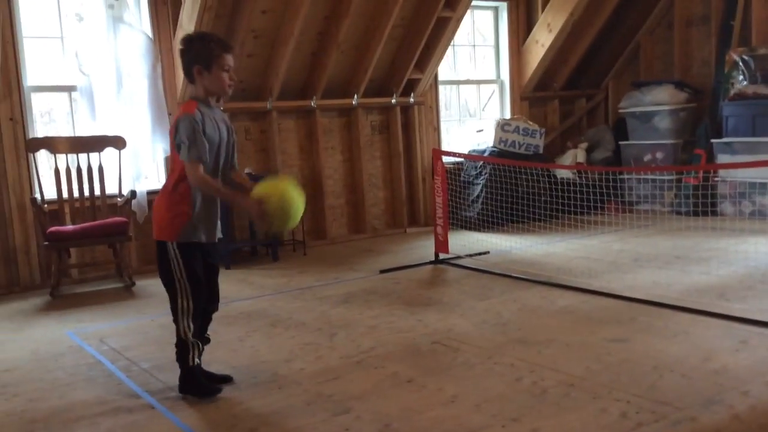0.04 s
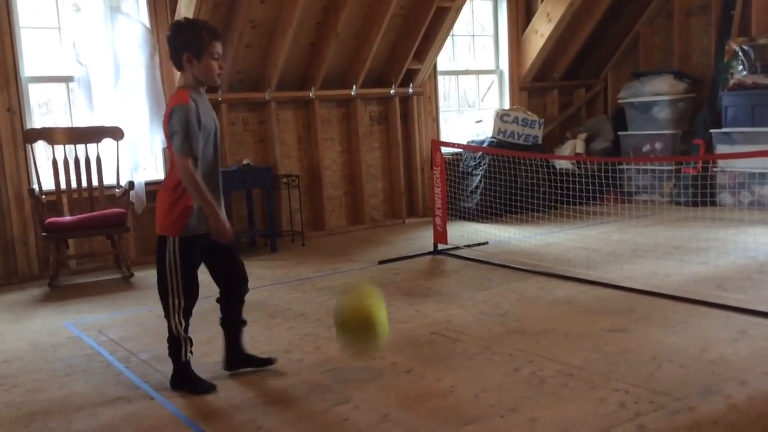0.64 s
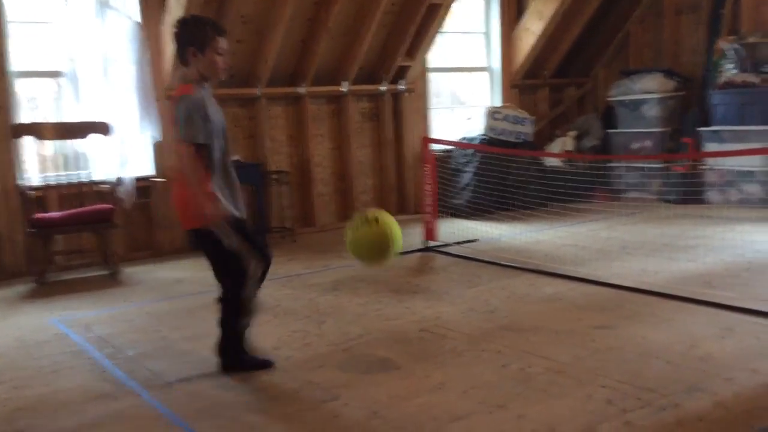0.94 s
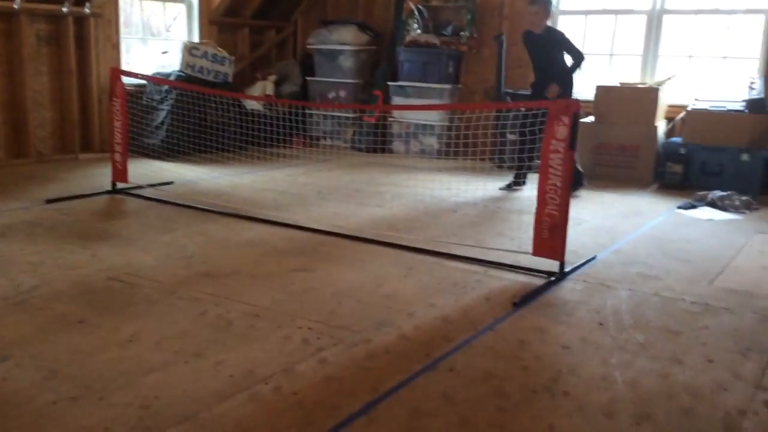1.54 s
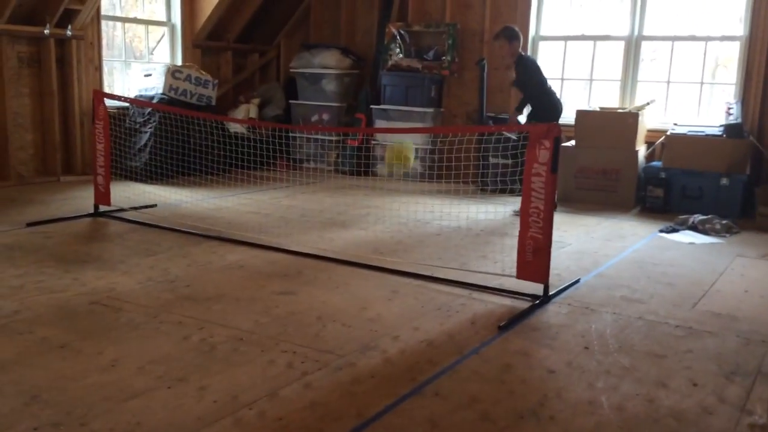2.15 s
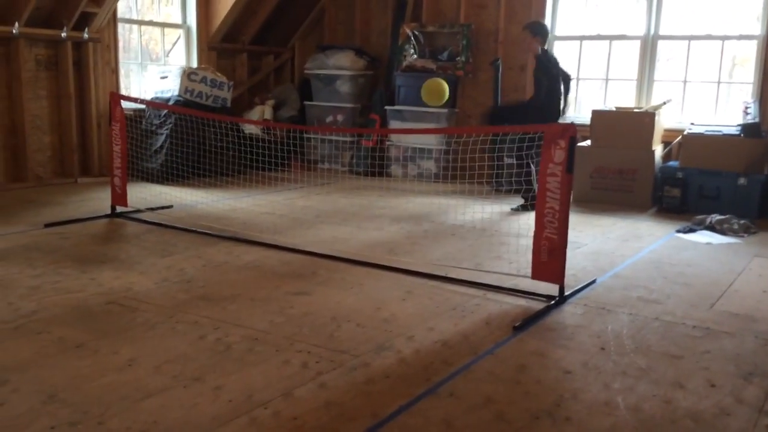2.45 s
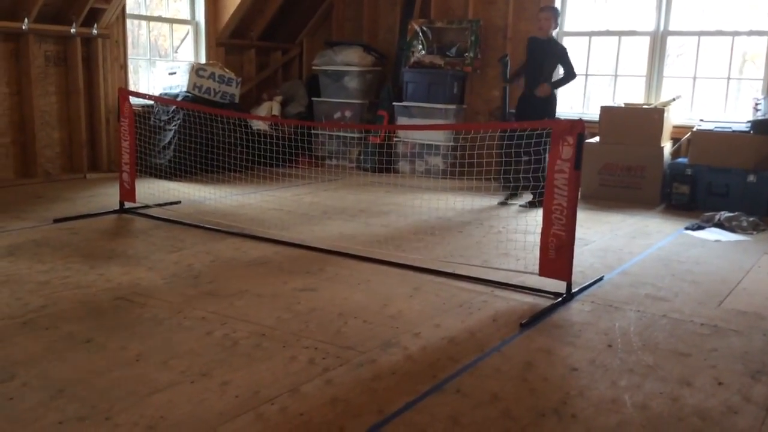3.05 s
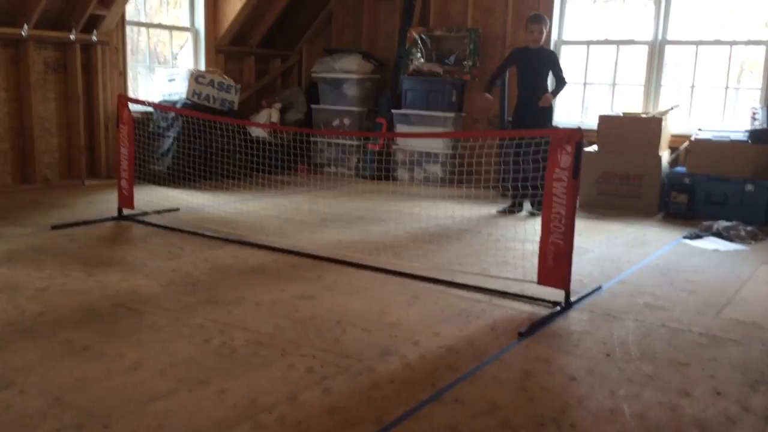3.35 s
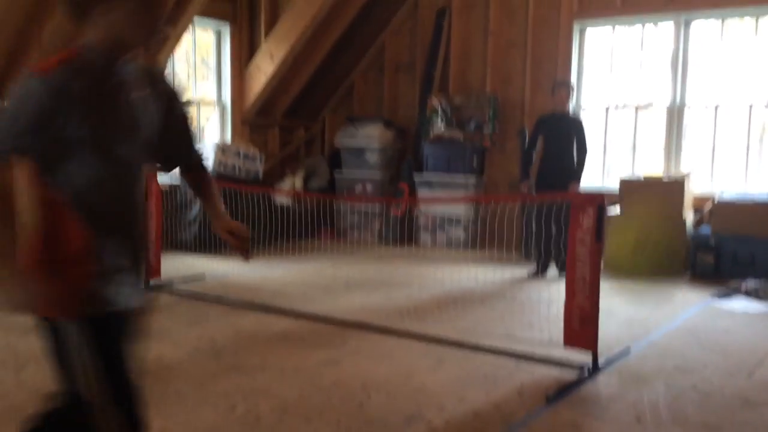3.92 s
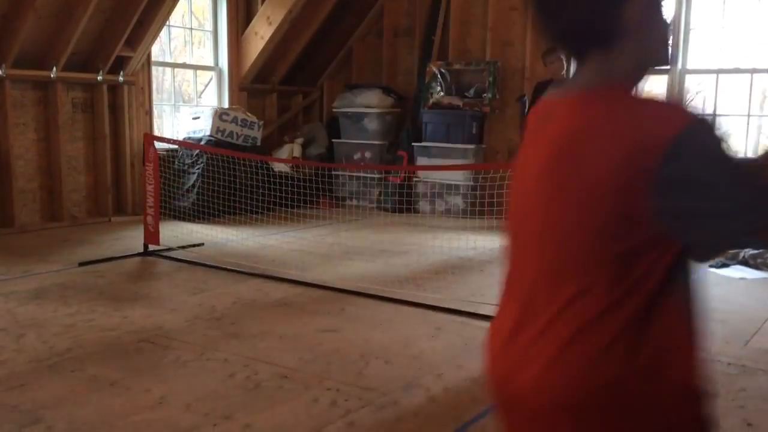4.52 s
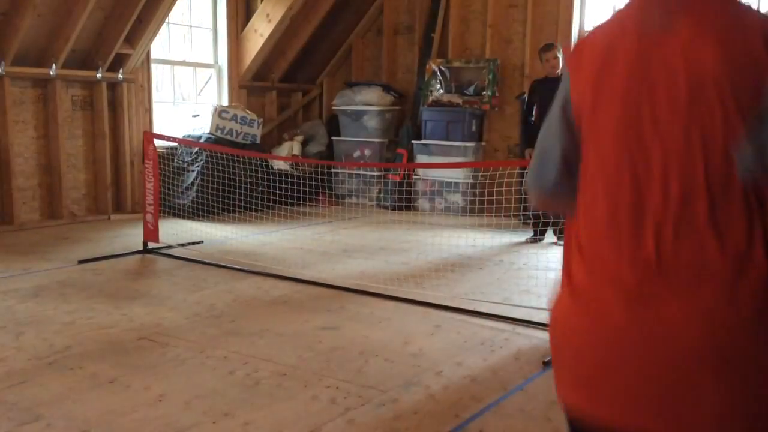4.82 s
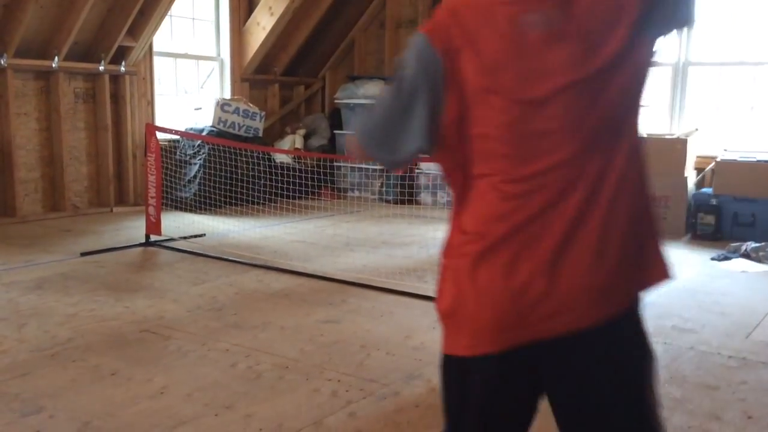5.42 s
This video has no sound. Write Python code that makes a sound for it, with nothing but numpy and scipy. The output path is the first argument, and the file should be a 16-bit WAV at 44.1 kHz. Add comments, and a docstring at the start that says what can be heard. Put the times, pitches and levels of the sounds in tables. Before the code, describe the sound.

Hollow, ringing smacks of a big ball boom on floorboards in an echoing room, between padded steps and fabric swishes.

```python
"""Two players in socks kick a big felt-covered ball over a net in a bare wooden attic.
Clothes rustle over a faint hiss, then the first of six blows lands at 0.8 s. Each one snaps the shell,
rings the air inside the ball and booms the plywood floor; the rafters echo it. Soft steps, hollow knocks
and swishes fill the gaps. The hardest blow comes at 3.9 s and a softer one at 4.5 s;
a last few knocks and steps give way to rustling clothes."""
import sys
import numpy as np
from scipy import signal
from scipy.fft import rfft, irfft
from scipy.io import wavfile
from scipy.ndimage import uniform_filter1d

SR = 44100
rng = np.random.default_rng(int(sys.argv[2]) if len(sys.argv) > 2 else 0)


def wav_out(sig):
    """Save sig, one row per channel (or a flat mono array), as 16-bit PCM at SR to the path in sys.argv[1]."""
    wavfile.write(sys.argv[1], SR, np.round(np.clip(np.atleast_2d(sig).T, -1, 1) * 32767).astype(np.int16))


N = 245622
T = np.arange(SR) / SR  # one second, the life of a blow


def undb(db):
    """Decibels to gain."""
    return 10 ** (np.asarray(db) / 20)


def unit_rms(x):
    """Scale to an rms of 1."""
    return x / np.sqrt(np.mean(x ** 2))


def add(track, start_s, sound):
    """Mix a sound into the track."""
    i = max(int(start_s * SR), 0)
    track[i:i + len(sound)] += sound[:N - i]


def lowpass(x, hz, order=2):
    """Butterworth low-pass."""
    return signal.sosfilt(signal.butter(order, min(hz, SR / 2 - 1), fs=SR, output="sos"), x)


def colour(x, spectrum, tilt_db=0):
    """EQ through (freq_hz, level_db) points, tilted by tilt_db an octave; white noise keeps its level."""
    hz, db = np.transpose(spectrum)
    octaves = np.log2(np.maximum(np.fft.rfftfreq(len(x), 1 / SR), hz[0]) / 4000)
    gain = undb(np.interp(octaves, np.log2(hz / 4000), db) + tilt_db * octaves)
    return irfft(rfft(x) * unit_rms(gain), len(x))


def noise(spectrum, size):
    """Coloured noise with an rms near 1."""
    return colour(rng.standard_normal(size), spectrum)


def ring(modes, detune=0):
    """Struck modes; neighbours swing in opposite directions, and each hit detunes them a little."""
    out = np.zeros(len(T))
    for k, (hz, db, t60) in enumerate(modes):
        hz = hz * (1 + detune * rng.standard_normal())
        out += (-1) ** k * undb(db) * np.exp(-np.log(1000) * T / t60) * np.sin(2 * np.pi * hz * T)
    return out


# room tone: freq_hz, level_db
HISS_SPECTRUM = [(25, -4), (60, 3), (120, -0.5), (250, -7.5), (500, -16.5), (1000, -18.5), (3000, -26.5),
                 (5200, -22), (7200, -29), (8800, -20.5), (12000, -24), (15500, -30)]
def hiss(level_db=-64.7):
    """The quiet room: a low rumble and a faint hiss."""
    return undb(level_db) * noise(HISS_SPECTRUM, N)


# the attic's reverb bands: freq_hz, level_db, t60_s
ATTIC_BANDS = [(55, -3, .5), (83, 4, 0.36), (135, 3.5, 0.37), (210, -3, 0.5), (306, 5, 0.39),
               (500, 3.5, 0.56), (740, -0.5, 0.49), (1400, 1, 0.55), (4000, 1.5, 0.57), (8000, 0, 0.58),
               (14000, 1.5, .3)]
def attic(build_s=.006, lumpy_db=5, thicken_s=.023):
    """The echo from one spot: separate early reflections thicken into a wash that dies band by band."""
    log_hz = np.log(np.maximum(np.fft.rfftfreq(len(T), 1 / SR), 1))
    band_hz, levels_db, t60s = np.transpose(ATTIC_BANDS)
    paths = np.repeat(rng.uniform(-1, 1, len(T)), SR // 500)[:len(T)]  # a new strength every 2 ms
    scatter = undb(lumpy_db * np.exp(-T / thicken_s) * paths)
    spectrum = rfft(rng.standard_normal(len(T)) * scatter)
    build = 1 - np.exp(-(T / build_s) ** 2)
    out = 0
    for share, db, t60 in zip(np.eye(len(band_hz)), levels_db, t60s):
        fade = build * np.exp(-np.log(1000) * T / t60)
        band = irfft(spectrum * np.interp(log_hz, np.log(band_hz), share), len(T))
        out = out + undb(db) * band * fade / np.sqrt(np.sum((fade * scatter) ** 2))
    return out


def in_room(x, echo, room_db):
    """A dry sound plus its echo."""
    return x + undb(room_db) * signal.fftconvolve(x, echo)[:len(x)]


def slap(spectrum, decay_s, room_db, tilt_db=0):
    """A brief rough contact: a noise burst and its smooth echo, coloured together."""
    burst = rng.standard_normal(len(T)) * np.exp(-T / decay_s)
    wet = burst / np.linalg.norm(burst) + undb(room_db) * attic()
    return colour(np.pad(wet, (0, len(T))), spectrum, tilt_db)[:len(T)]


# the sharpest ticks of clothing and fingers: start_s, level_db, pitch_hz
SHARP_TICKS = [(.0394, -34.5, 11500), (.6186, -44, 8000), (1.1869, -31.5, 10000), (4.1965, -41, 11400),
               (4.303, -38.5, 4820), (4.428, -39, 8000), (4.5557, -35.5, 11000), (5.521, -35, 8820)]
def ticks(rustle_curve, decay_s=.0011, faint_per_s=2, faint_hz=9000, over_rustle_db=14, spread_db=2):
    """Clothing and fingers tick: a few sharp accents, and faint random ones that ride the rustle."""
    out = np.zeros(N)
    count = int(faint_per_s * N / SR)
    starts = rng.uniform(0, N / SR, count)
    rustle_db = np.interp(starts, *np.transpose(rustle_curve))
    levels_db = rustle_db + over_rustle_db + spread_db * rng.standard_normal(count)
    faint = [(start_s, db, faint_hz) for start_s, db in zip(starts, levels_db)]
    for start_s, level_db, hz in SHARP_TICKS + faint:
        click = noise([(hz / 8, -18), (hz / 2, -7), (hz, 0), (hz * 2, -10)], len(T))
        add(out, start_s, undb(level_db) * click * np.exp(-T / decay_s) / 2)
    return out


# rubbing fabric: freq_hz, level_db
CLOTH_SPECTRUM = [(200, -15.5), (1000, -13.5), (2500, -14.5), (5000, 0), (7000, -2), (8800, 4),
                  (12000, -6.5), (16000, -11.5)]
# the bed of rustle as the players move: time_s, level_db
RUSTLE_CURVE = [(0, -69), (.5, -86), (.95, -68), (1.47, -82), (1.54, -64), (1.88, -62.5), (2.04, -82),
                (2.2, -58), (2.65, -78), (3.29, -70), (3.35, -62.5), (4.1, -73), (4.92, -59.5), (5.17, -70),
                (5.5, -56.5), (5.57, -64)]
# quick swishes of a sleeve or a sock: peak_s, level_db
SWISH_CUES = [(.26, -64.5), (.8, -59.5), (1.16, -63), (1.695, -55.5), (2.11, -60), (2.385, -51),
              (3.01, -56.5), (3.78, -64), (4.44, -61), (4.65, -40.3), (5.09, -57)]
def clothes(rise_s=.02, fall_s=.04, grain_db=2.0, flutter_db=.8):
    """Fibres catch and slip in a slow rustle and in quick swishes; now and then something ticks."""
    t = np.arange(N) / SR
    power = undb(2 * np.interp(t, *np.transpose(RUSTLE_CURVE)))
    for peak_s, level_db in SWISH_CUES:
        speed = 2 ** ((level_db + 56) / 20)  # rise and fall run twice as fast for each 20 dB above -56
        age = (t - peak_s) * speed
        swish = np.exp(-2 * np.where(age < 0, (age / rise_s) ** 2, age / fall_s))
        power = power + undb(2 * level_db) * swish
    grain = unit_rms(uniform_filter1d(rng.standard_normal(N), size=90))
    flutter = unit_rms(uniform_filter1d(rng.standard_normal(N), size=900))
    texture = undb(grain_db * grain + flutter_db * flutter)
    rub = np.sqrt(power / 2) * texture * noise(CLOTH_SPECTRUM, N)
    return in_room(rub + ticks(RUSTLE_CURVE), attic(), room_db=-6)


# a padded contact: freq_hz, level_db
TAP_SPECTRUM = [(100, -8), (250, -1.5), (1100, -6.5), (1500, -21), (3000, -22), (12000, -35)]
def tap(decay_s, room_db):
    """The dull attack of a knock or a heel."""
    return slap(TAP_SPECTRUM, decay_s, room_db)


# soft hollow knocks: start_s, level_db, pitch_hz, t60_s
KNOCK_CUES = [(1.039, -31, 420, .08), (1.731, -39.5, 235, .074), (1.825, -42, 185, .07),
              (1.847, -42.5, 200, .14), (2.122, -45.5, 278, .04), (3.187, -48.5, 370, .12),
              (3.384, -41.5, 264, .1), (3.762, -35, 283, .15), (4.302, -25.5, 279, .09),
              (4.644, -21.5, 306, .02), (4.928, -25.5, 275, .085)]
def knocks(swell_s=.0022, room_db=-11.5):
    """A soft touch swells one hollow resonance, with weaker partials well below and above it."""
    out = np.zeros(N)
    swell = 1 - np.exp(-T / swell_s)
    for start_s, level_db, hz, t60 in KNOCK_CUES:
        modes = [(hz, 0, t60), (hz * .67, -9, t60), (hz * 1.25, -10, t60), (hz * .47, -15, t60)]
        hollow = ring(modes) * swell
        tap_db = -23.5 + .6 * (level_db + 30)  # the tap grows more slowly than the ring
        touch = undb(tap_db) * tap(decay_s=.013, room_db=-5)
        add(out, start_s, undb(level_db) * in_room(hollow, attic(), room_db) + touch)
    return out


# plywood on joists: pitch_hz, level_db, t60_s
FLOOR_MODES = [(47, -14, 0.63), (64, -18, 1), (74.55, -9, 0.54), (81.5, -6, 0.38), (97, -3.5, 0.34),
               (120.9, -4, 0.38), (135.2, -8, 0.24), (168, -9.5, .2), (206, -16.5, 0.29),
               (236.2, -20, 0.12), (292.6, -18.5, .3)]
def floor(detune):
    """The struck plywood booms in its low modes."""
    return ring(FLOOR_MODES, detune)


# footfalls: start_s, level_db, heel_db
STEP_CUES = [(1.018, -42.5, 15.5), (1.524, -66, 30), (1.673, -62, 30), (1.878, -58, 29), (2.394, -43, 22),
             (2.462, -37.5, 9.5), (2.566, -46, 7.5), (3.068, -50, -10), (4.507, -27, 2.5),
             (4.972, -41.5, 1)]
def steps(sag_hz=56, sag_db=1, sag_t60_s=.2):
    """Padded feet sag the boards and press the floor's low modes, with a dull tap of the heel."""
    out = np.zeros(N)
    for start_s, level_db, heel_db in STEP_CUES:
        bright_hz = 118 * 2 ** (.015 * (level_db + 40))  # heavier steps are brighter
        boards = floor(detune=.041) + ring([(sag_hz, sag_db, sag_t60_s)], detune=.054)
        thud = in_room(lowpass(boards, bright_hz), attic(), room_db=-7.5)
        heel = undb(heel_db) * tap(decay_s=.027, room_db=-2)
        add(out, start_s, undb(level_db) * (thud + heel))
    return out


# the ball's rubber shell: pitch_hz, level_db
SHELL_MODES = [(290, -19), (400, -16.5), (680, -7.5), (830, 0), (990, -1.5), (1180, -4), (1380, -2),
               (1780, -8.5), (2300, -9), (2750, -10)]
def shell_snap(blow_db, t60_cycles=13, rebound_s=.0023, rebound_db=-10):
    """The shell snaps inward, then more weakly outward; rubber damps every mode in the same few cycles."""
    tuning = 2 ** (.003 * blow_db)  # a weaker blow rings a little lower
    shell = ring([(hz * tuning, db, t60_cycles / hz) for hz, db in SHELL_MODES], detune=.027)
    rebound = undb(rebound_db) * np.interp(T - rebound_s, T, shell, left=0)
    return rebound - shell


# the air inside the ball: pitch_hz, level_db
CAVITY_MODES = [(685, -8), (850, -8.5), (958, -4.5), (1023, -2.5), (1125, -2.5), (1363, 2), (1755, -8),
                (1915, -7.5), (2008, -5.5), (2310, -16), (2750, -10), (3450, -13)]
def cavity_ring(level_db=-29, t60_s=.24):
    """The trapped air rings on after the snap."""
    return undb(level_db) * ring([(hz, db, t60_s) for hz, db in CAVITY_MODES], detune=.0033)


# the slap of the felt cover: freq_hz, level_db
FELT_SPECTRUM = [(300, -23), (1200, 3), (2600, -2.5), (3600, -2), (5200, -1.5), (7000, -6.5), (8700, 0.5),
                 (12000, -13.5), (16000, -12)]
# blows on the ball: start_s, level_db, bright_hz, push_db, boom_db, felt_db, tilt_db_per_octave, room_db
BLOW_CUES = [ (0.825, -12, 1900, -1.5, -13.5, -8.5, -2.5, -2),
             (1.1820, -24.5, 1380, 2, -12.5, 2.5, 0, -3.5), (2.187, -15.3, 2700, -5, -10, 10, -6.5, 3),
             (2.689, -29.5, 1390, 4, -5.5, 10, -3, 5), (3.8930, -3.5, 2200, -3, -13.5, 8.5, -8, -3),
             (4.4975, -24, 1610, -12.5, -8, 9.5, -3, -5.5)]
def ball(push_s=.00094, push_lag_s=.001, felt_s=.003):
    """The ball flattens and springs back: shell snaps, felt slaps, air rings and the floor booms."""
    out = np.zeros(N)
    # flattening sucks air in, the rebound pushes it out: one slow swing of pressure around the snap
    lead_s = (SR // 200) / SR
    age = (T - lead_s - push_lag_s) / push_s
    swing = age * np.exp((1 - age ** 2) / 2)
    for start_s, level_db, bright_hz, push_db, boom_db, felt_db, tilt_db, room_db in BLOW_CUES:
        snap = shell_snap(level_db)
        air = cavity_ring()
        echo = attic()
        # a soft foot excites fewer high modes than the hard floor
        body = lowpass(in_room(snap, echo, room_db) + air, bright_hz, order=3)
        felt = undb(felt_db) * slap(FELT_SPECTRUM, felt_s, room_db, tilt_db)
        boom = undb(boom_db) * in_room(floor(detune=.0087), attic(), room_db=-5)
        push = undb(push_db) * in_room(swing, echo, room_db - 2)
        add(out, start_s - lead_s, undb(level_db) * push)
        add(out, start_s, undb(level_db) * (body + felt + boom))
    return out


def scene():
    """Ball, feet, knocks and clothes in the quiet room, in mono."""
    return (ball() + hiss() + steps() + knocks() + clothes())[None]


def record(dry):
    """The phone thins the deepest bass, clips at full scale and cuts the top."""
    low_cut = signal.butter(3, 35, "high", fs=SR, output="sos")
    high_cut = signal.ellip(10, .2, 70, 15600, fs=SR, output="sos")
    clipped = np.clip(signal.sosfilt(low_cut, dry), -1, 1)
    return signal.sosfilt(high_cut, clipped)


dry = scene()
out = record(dry)
wav_out(out)
```